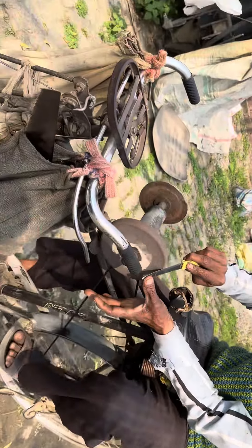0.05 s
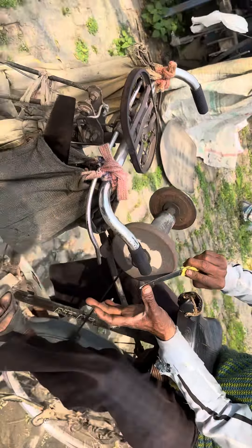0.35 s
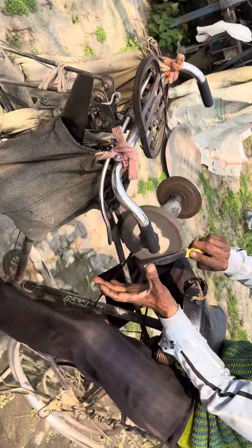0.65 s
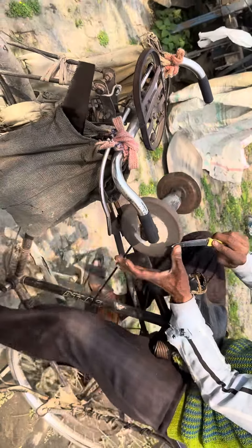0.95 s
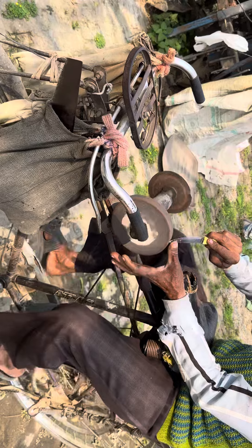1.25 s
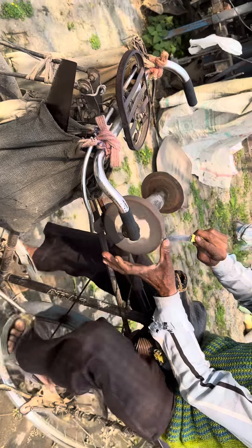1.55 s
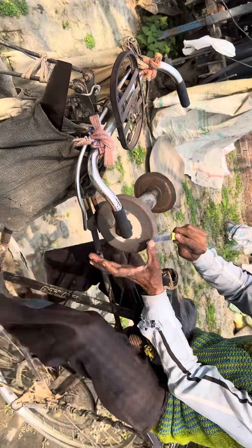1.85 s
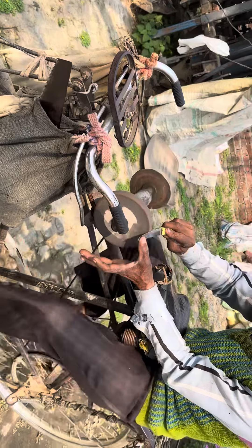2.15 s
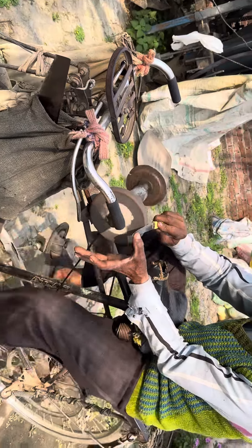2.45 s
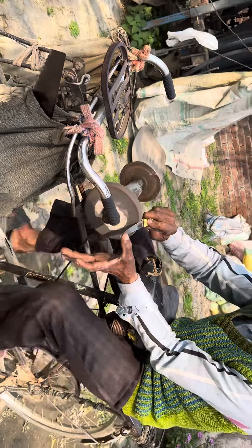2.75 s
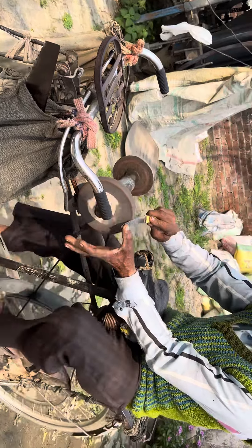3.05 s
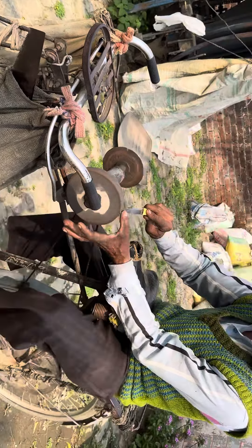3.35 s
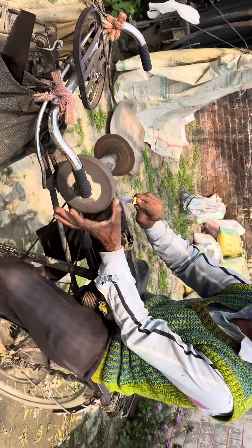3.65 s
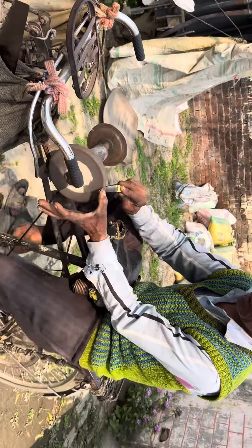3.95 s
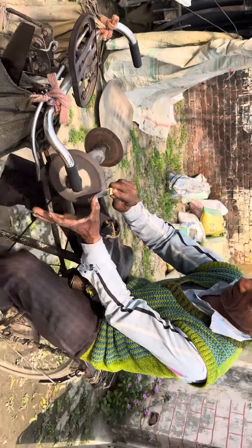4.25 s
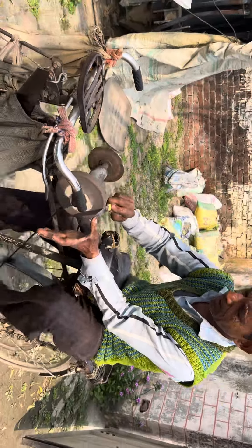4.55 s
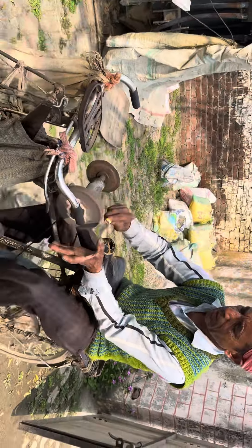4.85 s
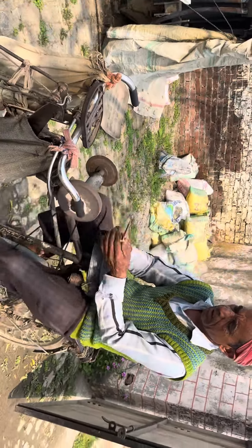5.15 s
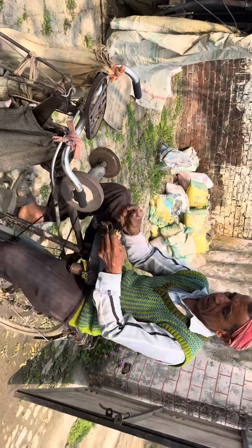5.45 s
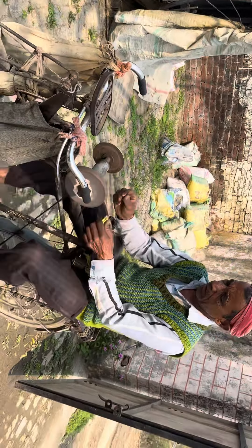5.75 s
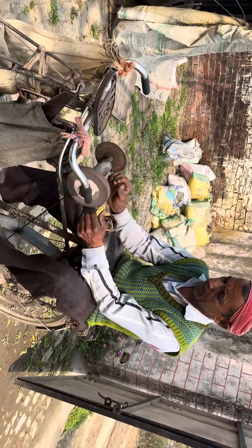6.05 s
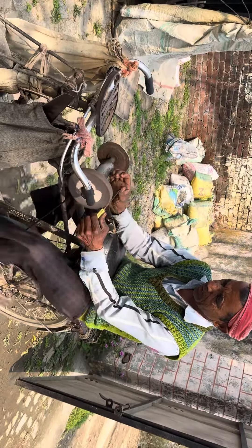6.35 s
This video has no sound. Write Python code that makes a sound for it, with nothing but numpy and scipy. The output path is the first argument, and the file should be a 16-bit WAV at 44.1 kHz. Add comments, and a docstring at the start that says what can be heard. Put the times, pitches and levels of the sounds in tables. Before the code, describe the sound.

Steel grinding on a spinning stone with a fluttering hiss, lifting briefly and touching down again, while the bicycle drive rattles and knocks.

```python
"""Outdoors, distant traffic: a knife is sharpened on a stone wheel pedalled from a standing bicycle.
The chain ticks, the loose spindle rattles, knocks and squeaks once, and the drive drones in the frame.
Grit rasps the steel; the blade's resonances glide as the contact point slides along it.
Rasp and rattle throb once a turn. The blade is lifted for a moment, then touches down again."""
import sys
import numpy as np
from scipy import signal
from scipy.fft import rfft, irfft, next_fast_len
from scipy.io import wavfile
from scipy.ndimage import map_coordinates

SR = 44100
rng = np.random.default_rng(int(sys.argv[2]) if len(sys.argv) > 2 else 0)


def file_out(sig):
    """Save sig as 16-bit WAV at sys.argv[1]."""
    # one column per channel
    cols = np.atleast_2d(sig).T
    # limit, then scale
    lim = np.clip(cols, -1, 1)
    pcm = np.round(lim * 32767).astype(np.int16)
    wavfile.write(sys.argv[1], SR, pcm)


N = 286650

# Spectra of traffic, chain, spindle and rasp. Each row: frequency in Hz, relative density in dB.
TRAFFIC_SPECTRUM = [(20, -40), (32, -6), (50, -7), (65, -2), (95, -3), (140, -12), (240, -1), (400, -0.5),
                    (1000, -8), (3000, -9), (10000, -27)]
CHAIN_SPECTRUM = [(200, -8), (800, -4), (1400, 0), (2100, 6), (3300, -6.5), (4400, -18), (7500, -10),
                  (10000, -9), (12500, -54), (15700, -55)]
SPINDLE_SPECTRUM = [(60, -17), (200, -13.5), (400, -12.5), (680, -11.5), (850, -2.5), (1300, 0.5),
                    (1700, -8.5), (2600, -9.5), (3400, -10), (4500, -15), (7500, -14.5), (10000, -19.5),
                    (12500, -63), (15700, -65)]
RASP_SPECTRUM = [(40, -65), (150, -23), (400, -26.5), (1000, -12.5), (2000, -12), (3000, -7.5),
                 (4300, -7.5), (5200, -4), (6300, -5.5), (7300, -3.5), (8800, -1.5), (10200, -2),
                 (11000, -18.5), (14000, -18), (15000, 0), (15700, -2.5)]
# Steady resonances of street, bicycle frame and blade. Each row: centre in Hz, width in Hz, lift in dB.
TRAFFIC_BOOMS = [(97, 14, 6), (132, 10, 7.5), (176.3, 7.4, 12)]
FRAME_MODES = [(237, 56, 3.5), (482.4, 36.6, 14), (820, 45, 7), (1028, 42, 6.5), (2680, 40, 5.5)]
BLADE_MODES = [(3757, 25, 3), (4620, 45, 4), (5446, 45, 4), (5944, 55, 3), (6815, 30, 5), (8939, 45, 4)]
# Reflections off ground, frame and wall. Each row: delay in seconds, gain in dB.
YARD_ECHOES = [(.0031, -14), (.0074, -17), (0.011, -17), (0.019, -20.5), (0.026, -24.5)]
# Phase between the microphone ports. Each row: frequency in Hz, lead of the left in radians.
PORT_LEAD_RAD = [(300, 0), (470, .3), (580, -.7), (800, .5), (1150, -.2), (2600, .25), (4100, 0),
                 (4650, -1.4), (5050, -3.1), (5800, -6.1), (7000, -6.45), (9800, -8.3), (11600, -9.4),
                 (13800, -9.45), (15700, -10.2)]
# Port balance. Each row: frequency in Hz, left minus right in dB.
PORT_BALANCE_DB = [(330, 0), (510, 5), (640, -4), (850, -1), (1400, -5), (2100, -2), (2800, 1), (3700, 0),
                   (4400, 4), (6000, 0)]
# Port likeness. Each row: frequency in Hz, coherence from 0 to 1.
PORT_COHERENCE = [(60, .998), (140, .92), (250, .8), (600, .65), (1200, .9), (2600, .72), (3800, .9),
                  (5300, .65), (6700, .88), (10400, .8), (11700, .995), (13800, .995), (15000, .8)]
# Wheel speed, surging with the pedalling. Each row: time in seconds, turns per second.
WHEEL_SPEED_HZ = [(0, 17.25), (.4, 18.25), (.8, 18), (1.2, 20.25), (1.5, 22.125), (1.8, 19.625),
                  (2.1, 18.125), (2.4, 18.25), (2.7, 17.75), (3, 18.875), (3.3, 21.375), (3.7, 23.25),
                  (4, 20.75), (4.3, 21.875), (4.7, 21.875), (5.1, 20.875), (5.5, 21.375), (6, 22.75),
                  (6.5, 23.5)]
# Rattle, fading as the listener steps back. Each row: time in seconds, relative level in dB.
RATTLE_LEVEL_DB = [(0, -33.5), (1, -33.5), (1.35, -31.5), (1.7, -35), (2.3, -33), (3.2, -36), (4.4, -38),
                   (4.7, -40.5), (6.5, -38)]
# Blows of link on sprocket and spindle on bearing. Each row: start in seconds, peak in dB.
LINK_CLINKS = [(5.088, -34), (5.546, -37), (5.654, -36), (5.688, -36), (5.72, -37), (5.771, -36)]
BEARING_KNOCKS = [(1.127, -26), (1.228, -24), (1.328, -26), (1.415, -21), (1.503, -24), (1.68, -23),
                  (2.188, -21), (2.429, -25), (2.828, -19), (3.474, -24), (3.565, -25), (3.606, -30),
                  (3.654, -21.5), (3.69, -26), (3.733, -26), (3.774, -22), (3.863, -22.5), (4.106, -27),
                  (4.202, -21.5), (4.346, -25), (4.527, -28)]
# Modes those blows ring. Each row: frequency in Hz, relative level in dB, T60 in seconds.
LINK_MODES = [(2200, -4, .025), (2690, -2, .03), (2965, 0, .03), (3330, -5, .03), (3950, -5, .025)]
BEARING_MODES = [(830, -5, .016), (985, 0, .022), (1150, -4, .014), (1320, -2, .014)]
# Tones: drive in the frame, spindle squeak (one row), lowest bending mode of the blade (one row).
# Each row: peak time, rise and fall in seconds, pitch in Hz, glide in Hz per second, level in dB.
FRAME_DRONES = [(.55, 0.034, .09, 488, -1, -42), (.86, 0.091, 0.064, 483, 0.5, -42),
                (5.62, .04, .04, 220, 350.5, -46.5), (5.82, 0.053, 0.15, 250, -47, -49),
                (6.28, .07, .16, 247.6, -19, -50)]
SPINDLE_SQUEAK = (5.885, .03, .06, 5600, 2000, -44)
BLADE_HUM = (.32, .045, .16, 237, -115, -41.5)
# Blade on stone, one list before the lift and one after.
# Each row: time in seconds, relative rasp level in dB, relative low-treble bite in dB.
BLADE_PASSES = [
    [(0.0, -23, 2.5), (0.21, -24, -1.5), (0.43, -21.5, -10), (0.75, -25, -1.5), (0.84, -23.5, -4.5),
     (1.02, -33, -9), (1.13, -25.5, -7.5), (1.4, -27.5, -14), (1.65, -24, -5), (1.82, -24, -7.5),
     (2.09, -22, -4), (2.67, -23, -10.5), (2.95, -22.5, -6), (3.03, -28.5, -9.5), (3.29, -31, -10.5),
     (3.37, -28.5, -10.5), (3.5, -29, -30), (3.6, -31.5, -16), (3.7, -20.5, -14), (3.79, -26.5, -9.5),
     (4.3, -22.5, -7), (4.56, -25.5, -6.5), (4.63, -24, -14), (4.82, -25.5, -9.5)],
    [(6.18, -33, -4), (6.35, -30, 0), (6.5, -29, -2)],
]
# Blade hops off the stone. Each row: centre in seconds, half length in seconds, depth in dB.
BLADE_HOPS = [(0.543, 0.013, -13), (0.574, 0.0049, -5), (1.58, 0.0072, -1)]
# Brief presses of steel on stone. Each row: start in seconds, hold in seconds, relative level in dB.
BLADE_TOUCHES = [(.516, 0.02, -24), (0.562, 0.019, -29), (1.541, 0.017, -30), (2.482, 0.045, -32.5),
                 (2.595, 0.075, -36), (3.651, 0.0069, -26), (6.054, 0.0045, -38.5), (6.076, 0.02, -35.5),
                 (6.131, 0.0043, -33), (6.138, .012, -37), (6.183, .002, -26)]
# Resonances following the contact point.
# Each row: start and end in seconds, start, middle and end pitch in Hz, lift in dB, width in Hz.
BLADE_GLIDES = [ (0, .04, 4000, 3960, 3900, 7, 220), (.1, .3, 2600, 2450, 2150, 4.5, 500),
                (.3, .44, 4380, 4330, 4220, 8, 300), (.33, .52, 1980, 1660, 1320, 19, 240),
                (0.295, 0.514, 5100, 5160, 5000, 5, 300), (.15, .5, 9300, 9750, 9550, 9, 550),
                (0.495, .9, 9350, 9300, 8700, 7, 500), (.51, .63, 3980, 3900, 3750, 10, 380),
                (.71, .9, 4120, 4220, 4500, 9, 320), (0.577, 0.796, 5450, 5270, 5480, 1, 260),
                (.6, .76, 1400, 1600, 2100, 9, 350), (1.12, 1.605, 8650, 8640, 8500, 9, 700),
                (1.12, 1.5, 5430, 5700, 5500, 5, 500), (1.5, 1.7, 5000, 4790, 4400, 7, 350),
                (1.79, 2.06, 2880, 3000, 3200, 15, 240), (1.77, 2.04, 5300, 5430, 5600, 9, 280),
                (1.85, 2.477, 8580, 8840, 8400, 8, 700), (2.08, 2.34, 3720, 3910, 4080, 12.5, 330),
                (2.49, 2.74, 3050, 2100, 1620, 15.5, 300), (2.82, 2.92, 1620, 1580, 1560, 10, 300),
                (2.5, 2.62, 5000, 5030, 4730, 10, 300), (2.56, 2.95, 8740, 7200, 6640, 9, 580),
                (2.69, 2.95, 4400, 4400, 4440, 9, 300), (3.047, 3.596, 8500, 8170, 8100, 6.5, 650),
                (3.054, 3.602, 5720, 5680, 5360, 7, 600), (3.87, 4.15, 2780, 2930, 3300, 9.5, 300),
                (4.15, 4.25, 3800, 3950, 3950, 6, 550), (4.225, 4.337, 8500, 8200, 7840, 10.5, 400),
                (4.29, 4.48, 3060, 2870, 2600, 13, 340), (4.3, 4.8, 5070, 4920, 4630, 7, 380),
                (4.54, 4.76, 2300, 1870, 1570, 12, 290), (4.58, 4.84, 8590, 7470, 7000, 11.5, 600),
                (6.29, 6.5, 4400, 4320, 4260, 13.5, 230), (6.25, 6.498, 9100, 9300, 9250, 5, 550),
                (6.308, 6.504, 7000, 6840, 6900, 0, 302)]
# Modes damped while the stone touches their node.
# Each row: start and end in seconds, centre in Hz, width in Hz, depth in dB.
NODE_DIPS = [(0, 0.553, 6000, 600, -1), (1.12, 1.5, 7360, 600, -1), (1.722, 2.032, 3500, 500, -4),
             (1.716, 2.1, 9170, 900, -7), (2.133, 2.44, 5170, 1100, -11), (4.2, 4.798, 6100, 499, -4),
             (4.584, 4.82, 3820, 596, -3), (6.248, 6.5, 5130, 1000, -10)]

GLIDE_FADE_S = .06


def amp(db):
    """Decibels to gain."""
    return 10 ** (np.asarray(db) / 20)


def unit(x):
    """Scale to rms 1."""
    return x / np.sqrt(np.mean(x ** 2) + 1e-20)


def along(points, hz):
    """(Hz, value) points read on a log axis."""
    knots_hz, values = np.transpose(points)
    return np.interp(np.log(hz + 1), np.log(knots_hz + 1), values)


def curves(rows, t):
    """Each column after the time, read at times t."""
    knots_s, *columns = np.transpose(rows)
    return [np.interp(t, knots_s, column) for column in columns]


def during(start_s, end_s, t, fade_s):
    """1 from start to end, fading outside."""
    return np.clip(1 + np.minimum(t - start_s, end_s - t) / fade_s, 0, 1)


def wobble(rate_hz):
    """Smooth random curve, rate_hz knots a second."""
    knots = rng.standard_normal(int(N * rate_hz / SR) + 4)
    return map_coordinates(knots, [np.arange(N) * rate_hz / SR])


def patches(shape, bins, frames):
    """Smooth random field over frequency and time, rms 1."""
    window = np.outer(np.hanning(bins), np.hanning(frames))
    return unit(signal.fftconvolve(rng.standard_normal(shape), window, "same"))


def filtered(x, response):
    """Apply a frequency response."""
    size = next_fast_len(N + SR // 4)
    return irfft(rfft(x, size) * response(np.fft.rfftfreq(size, 1 / SR)), size)[..., :N]


def resonance(hz, centre_hz, width_hz, lift_db):
    """Gain of a peak or dip on a flat response."""
    return np.sqrt(1 + (amp(lift_db) ** 2 - 1) / (1 + (2 * (hz - centre_hz) / width_hz) ** 2))


def coloured(x, spectrum, modes):
    """Shape x by a spectrum and steady resonances, rms 1."""
    peaks = lambda hz: np.prod([resonance(hz, *mode) for mode in modes], axis=0)
    return unit(filtered(x, lambda hz: amp(along(spectrum, hz)) * peaks(hz)))


def grainy_noise(grain_gain, rate_hz, spread_db):
    """Two channels of noise plus tiny impacts at shared random moments, rms 1."""
    noise = rng.standard_normal((2, N))
    struck = rng.random(N) < rate_hz / SR
    sizes = amp(spread_db * np.clip(rng.standard_normal(N), -2, 2))
    grains = unit(struck * sizes * rng.standard_normal((2, N)))
    return unit(noise + grain_gain * grains)


def traffic():
    """Steady low murmur of a distant street."""
    level_db = -46 + .56 * wobble(3.9)
    return amp(level_db) * coloured(rng.standard_normal((2, N)), TRAFFIC_SPECTRUM, TRAFFIC_BOOMS)


def yard(x, drift_s):
    """Hard surfaces add weak echoes; their paths drift as the microphone is carried about."""
    n = np.arange(N)
    out = x.copy()
    for delay_s, db in YARD_ECHOES:
        delayed = n - SR * (delay_s + drift_s * wobble(2.5))
        out += amp(db) * np.array([np.interp(delayed, n, side, left=0) for side in x])
    return out


def ports(pair):
    """Two unrelated signals become left and right at a close pair of microphone ports."""
    mix_rad = lambda hz: np.arccos(np.clip(along(PORT_COHERENCE, hz), -1, 1)) / 2
    common, apart = filtered(pair, lambda hz: np.array([np.cos(mix_rad(hz)), np.sin(mix_rad(hz))]))
    sides = np.array([[.5], [-.5]])
    balance = lambda hz: amp(sides * along(PORT_BALANCE_DB, hz))
    lead = lambda hz: np.exp(1j * sides * along(PORT_LEAD_RAD, hz))
    return filtered(np.array([common + apart, common - apart]), lambda hz: balance(hz) * lead(hz))


def chain(turn_cos):
    """Links tick lightly over the sprockets and ring the frame."""
    ticks = grainy_noise(1.8, rate_hz=450, spread_db=-.5)
    return amp(-44) * coloured(ticks * amp(1.2 * turn_cos), CHAIN_SPECTRUM, FRAME_MODES)


def spindle(t, speed_hz, turn_cos, cruise_hz=20.6, db_per_hz=.6, throb_db=2.6):
    """The loose spindle rattles the frame, hardest once a turn, louder at speed."""
    rattle = grainy_noise(.49, rate_hz=900, spread_db=1.5)
    throb = amp(throb_db * turn_cos + 1.2 * wobble(170))
    level_db = curves(RATTLE_LEVEL_DB, t)[0] + db_per_hz * (speed_hz - cruise_hz) + .7
    return amp(level_db) * coloured(rattle * throb, SPINDLE_SPECTRUM, FRAME_MODES)


def strikes(blows, modes, attack_s, scatter_db=4):
    """Each blow rings the same modes, slightly detuned and in a new mix."""
    out, t = np.zeros(N + SR), np.arange(SR // 8) / SR
    hz, mode_db, t60_s = np.transpose(modes)[:, :, None]
    for start_s, peak_db in blows:
        mix, detune, phase = rng.standard_normal((3, len(modes), 1))
        decay = amp(mode_db + scatter_db * mix - 60 * t / t60_s)
        partials = decay * np.sin(2 * np.pi * (hz * (1 + .014 * detune) * t + phase))
        ring = partials.sum(axis=0) * (1 - np.exp(-t / attack_s))
        out[round(start_s * SR):][:len(t)] += amp(peak_db) * ring / np.abs(ring).max()
    return out[:N] * np.array([[1], [0]])  # common to both ports


def tone(row, t, waver_hz):
    """One vibration swells, glides and dies away, wavering in pitch and strength."""
    peak_s, rise_s, fall_s, hz, glide_hz_per_s, db = row
    age_s = t - peak_s
    pitch_hz = hz + glide_hz_per_s * np.clip(age_s, -2 * rise_s, 2 * fall_s)
    phase = 2 * np.pi * np.cumsum(pitch_hz + waver_hz * wobble(3 * waver_hz)) / SR
    swell = np.exp(np.minimum(age_s / rise_s, -age_s / fall_s))
    return amp(db + 1.5 * wobble(27.7)) * swell * np.sqrt(2) * np.sin(phase)


def sliding_contact(hz, t, chatter_db, droop=.3, tremble_hz=30, notch_below_hz=520):
    """Gain of the resonances that follow the trembling contact point in arcs, strongest midway."""
    gain = np.ones((len(hz), len(t)))
    for start_s, end_s, *pitches_hz, mid_db, width_hz in BLADE_GLIDES:
        position = np.clip(2 * (t - start_s) / (end_s - start_s) - 1, -1, 1)
        arc = np.polyfit([-1, 0, 1], np.log(pitches_hz), 2)
        centre_hz = np.exp(np.polyval(arc, position)) + tremble_hz * rng.standard_normal(len(t))
        lift_db = mid_db * (1 - droop * position ** 2) + chatter_db
        lift_db *= during(start_s, end_s, t, GLIDE_FADE_S)
        gain *= resonance(hz, centre_hz, width_hz, lift_db / 2) ** 2  # steep skirts
        gain /= resonance(hz, centre_hz - notch_below_hz, width_hz=240, lift_db=.3 * lift_db)
    return gain


def blade(x, chatter_db, weak_modes_db=2.7, flutter_db=1.5):
    """The blade colours the rasp: gliding resonances over many weak shifting ones."""
    bins_hz, t, spectra = signal.stft(x, SR, nperseg=1024, noverlap=768)
    hz = bins_hz[:, None]
    chatter_db = np.interp(t, np.arange(N) / SR, chatter_db)
    gain = sliding_contact(hz, t, chatter_db)
    for start_s, end_s, centre_hz, width_hz, depth_db in NODE_DIPS:
        gain *= resonance(hz, centre_hz, width_hz, depth_db * during(start_s, end_s, t, GLIDE_FADE_S))
    # Weak resonances give way to a strong one.
    gain *= amp(weak_modes_db * patches(gain.shape, bins=7, frames=37) / np.maximum(gain, 1))
    # Resonances share the energy; a flatter blade bites more in the low treble.
    low_rms, high_rms = [np.sqrt(np.mean(gain[(bins_hz > from_hz) & (bins_hz < to_hz)] ** 2, axis=0))
                         for from_hz, to_hz in [(2200, 4600), (5500, 10000)]]
    bite_db = curves(np.vstack(BLADE_PASSES), t)[1] + 6.55 + chatter_db / 2
    low_share = along([(4400, .72), (6200, .023)], hz)
    flutter = amp(flutter_db * patches(gain.shape, bins=61, frames=5))  # grit catches and lets go
    gain *= flutter * (amp(bite_db) / low_rms) ** low_share / high_rms ** (1 - low_share)
    return signal.istft(spectra * gain, SR, nperseg=1024, noverlap=768)[1][:, :N]


def hand_pressure(t, landing_s=.034, attack_s=.002, release_s=.003):
    """Steel pressed on stone, as a gain: two passes, with hops and brief touches."""
    pressure = sum(amp(curves(rows, t)[0]) * during(rows[0][0], rows[-1][0], t, landing_s)
                   for rows in BLADE_PASSES)
    for centre_s, half_s, depth_db in BLADE_HOPS:
        pressure *= amp(depth_db * np.exp(-((t - centre_s) / half_s) ** 2))
    for start_s, hold_s, db in BLADE_TOUCHES:
        onset = np.clip((t - start_s) / attack_s, 0, 1)
        pressure += amp(db) * onset * np.exp(-np.maximum(t - start_s - hold_s, 0) / release_s)
    return pressure


def rasp(t, turn_cos, firm_db=-23):
    """Grit cuts the steel, which shudders and rings harder once a turn."""
    grit = grainy_noise(.56, rate_hz=4500, spread_db=.5)
    pressure = hand_pressure(t)
    lightness = np.clip(1 - pressure / amp(firm_db), 0, 1)
    chatter_db = (1.2 + 6.5 * lightness) * turn_cos  # deeper under a light hand
    shudder_db = (-2 + 3.1 * lightness) * turn_cos + .7 * wobble(60) + .5 * wobble(350)
    hiss = blade(coloured(grit, RASP_SPECTRUM, BLADE_MODES), chatter_db)
    return amp(5.7 + shudder_db) * pressure * hiss


def scene():
    """One wheel paces rasp, rattle and chain; blows, tones and traffic join them."""
    t = np.arange(N) / SR
    speed_hz, = curves(WHEEL_SPEED_HZ, t)
    turns = np.cumsum(speed_hz) / SR
    turn_cos = np.cos(2 * np.pi * (turns - .53))  # 1 at the stone's high spot
    machine = rasp(t, turn_cos) + spindle(t, speed_hz, turn_cos) + chain(turn_cos)
    machine += strikes(BEARING_KNOCKS, BEARING_MODES, attack_s=.00086)
    machine += strikes(LINK_CLINKS, LINK_MODES, attack_s=.001)
    drones = sum(tone(row, t, waver_hz=10) for row in FRAME_DRONES)
    squeak = tone(SPINDLE_SQUEAK, t, waver_hz=170)
    hum = tone(BLADE_HUM, t, waver_hz=3.51)
    return ports(yard(machine, drift_s=.00015) + traffic()) + drones + squeak + hum


def record(dry):
    """The microphone sheds the deepest bass and all above its band limit."""
    bass_hz, top_hz = 38, 15800
    return filtered(dry, lambda hz: (hz < top_hz) * hz ** 4 / np.hypot(hz ** 4, bass_hz ** 4))


dry = scene()
out = record(dry)
file_out(out)
```